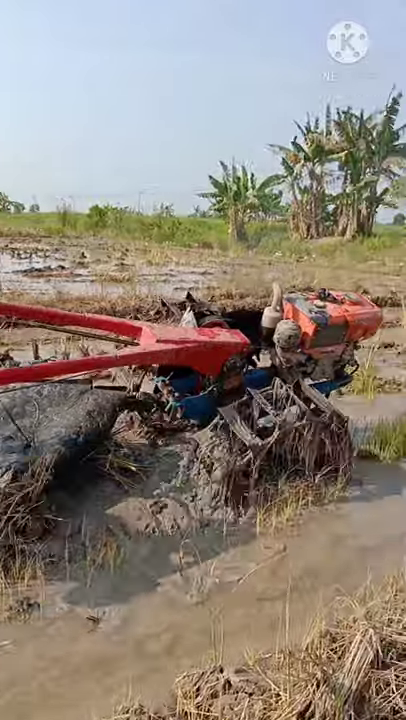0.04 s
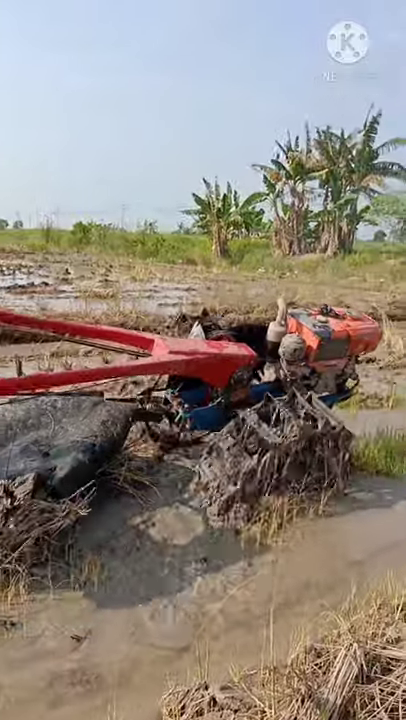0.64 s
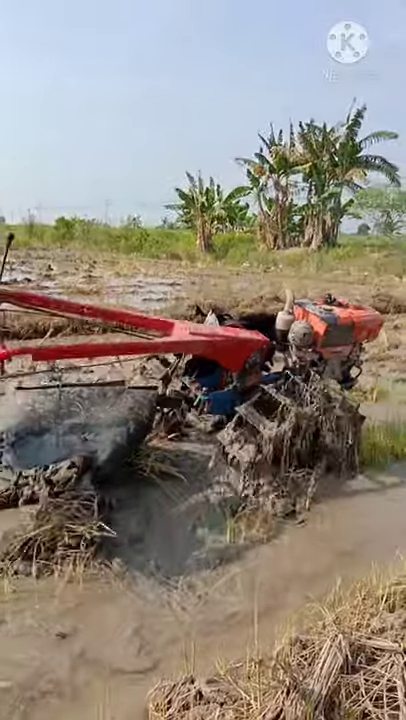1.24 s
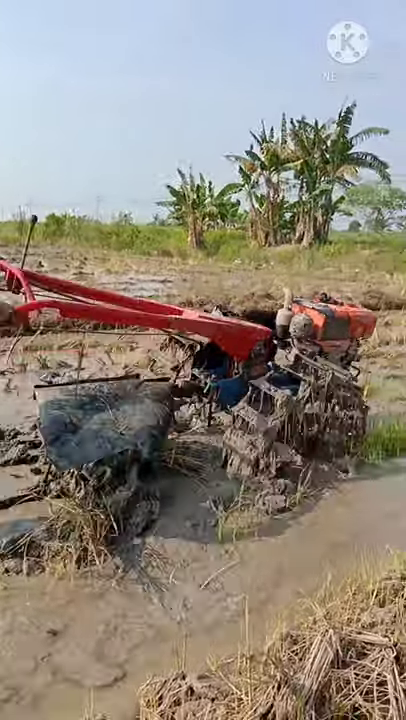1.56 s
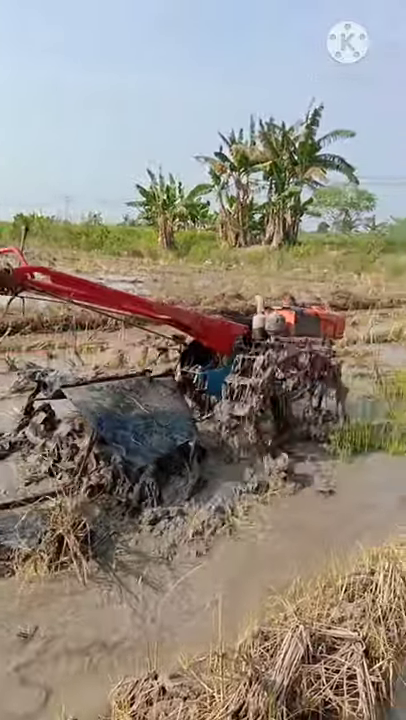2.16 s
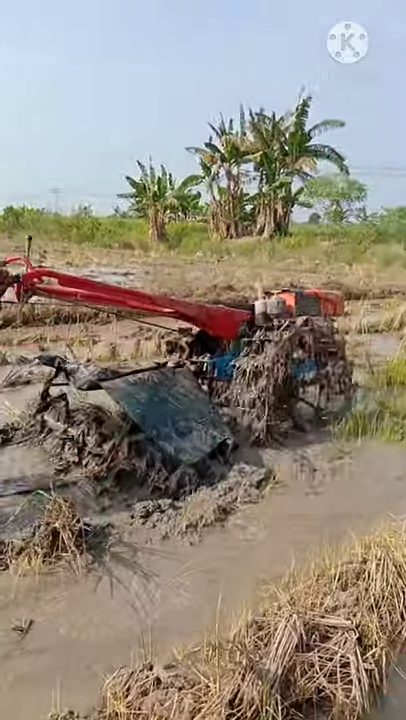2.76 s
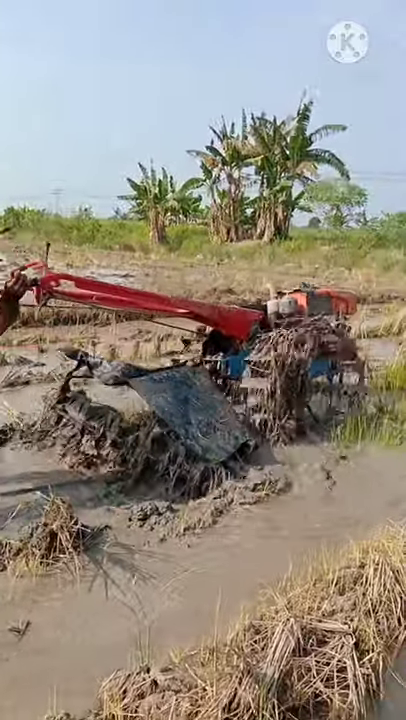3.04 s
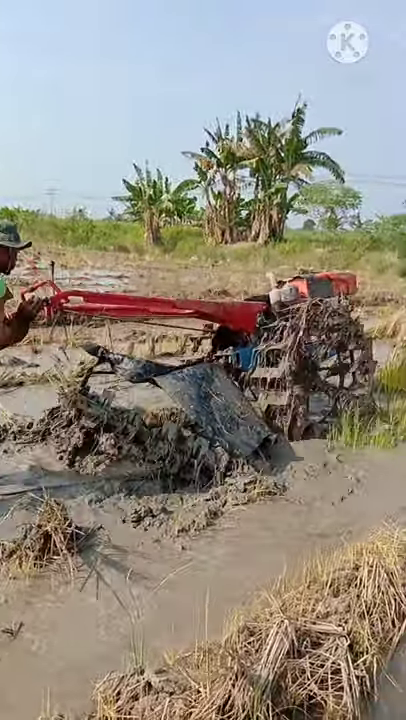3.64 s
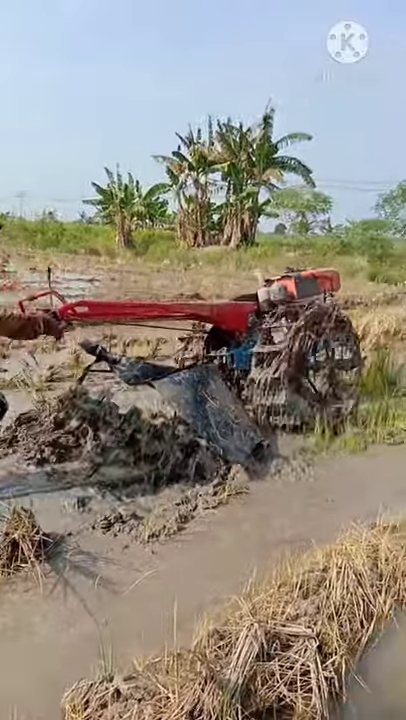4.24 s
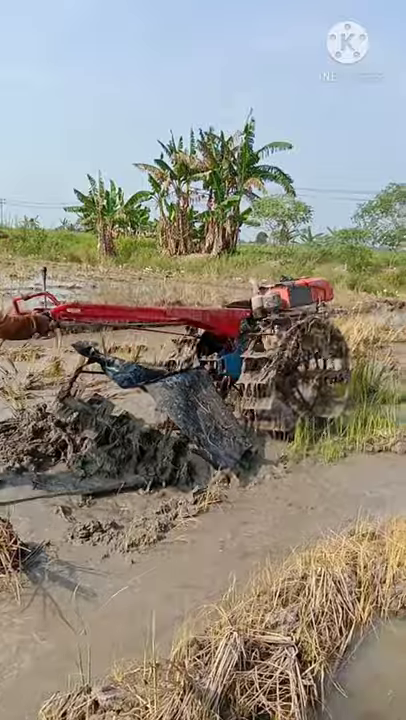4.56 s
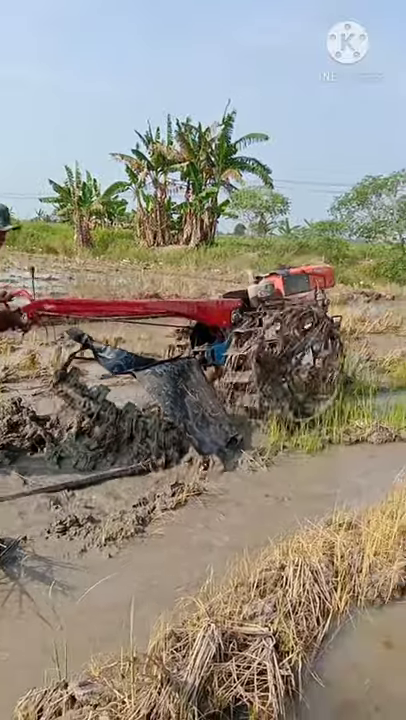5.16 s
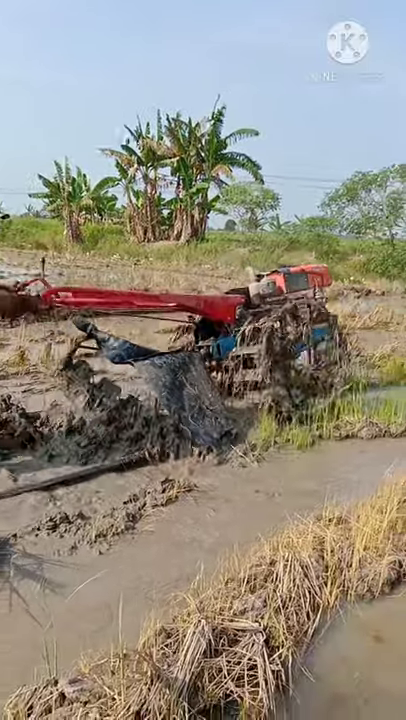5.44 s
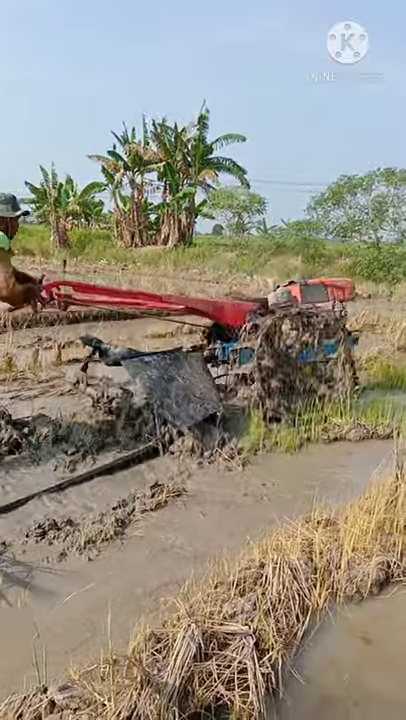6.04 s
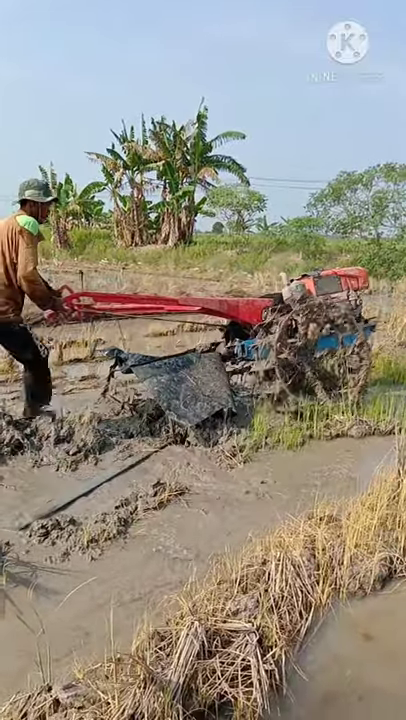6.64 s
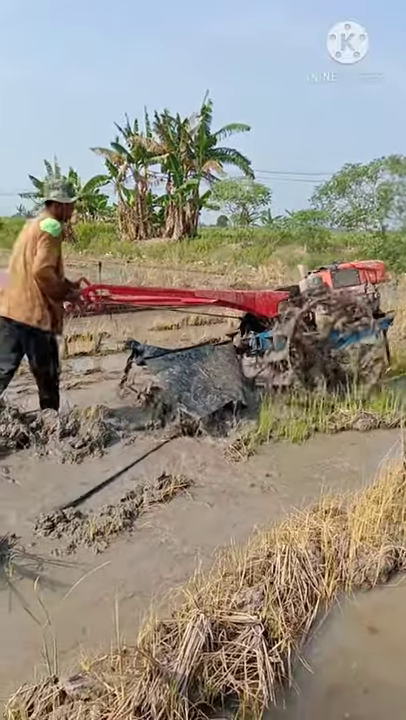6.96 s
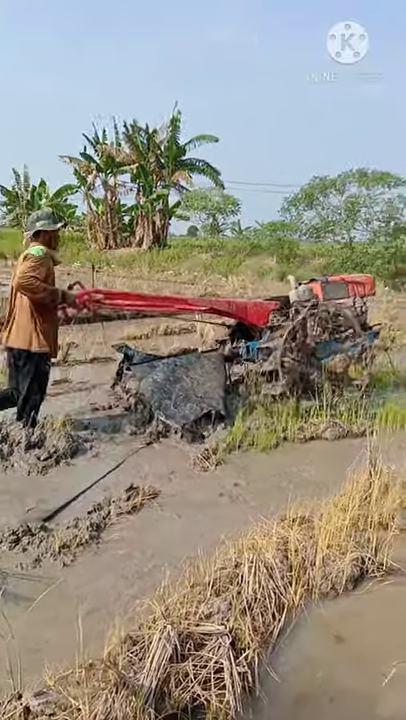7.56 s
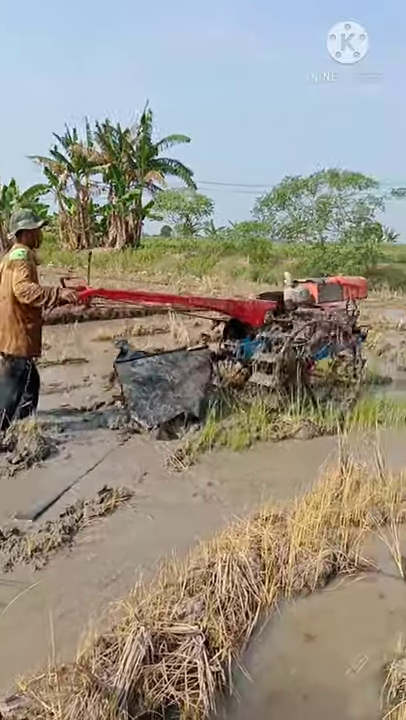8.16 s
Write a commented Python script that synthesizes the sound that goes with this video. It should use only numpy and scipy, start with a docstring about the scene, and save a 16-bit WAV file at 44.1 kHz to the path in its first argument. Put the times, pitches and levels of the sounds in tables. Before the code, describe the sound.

In an open, muddy field with no echo, a nearby walking tractor runs with a steady, hammering diesel beat. Each firing shakes loose steel into a clank, some ringing briefly, over a continuous metallic rattle. Gusts rumble on the microphone and build around the middle, where a few chassis knocks and mud splats are heard. The engine slows a little under load as the wind drops.

```python
"""Walking tractor in a flooded rice field

A one-cylinder diesel drags a plough through mud, a few metres away in the open. It fires about six
times a second: burning fuel knocks, then loose steel clanks and exhaust gas gives a low thump.
Gears and sheet metal clatter, the chassis knocks, mud splats, and gusts buffet the microphone."""
import sys
import numpy as np
from scipy import signal
from scipy.fft import rfft, irfft, next_fast_len
from scipy.io import wavfile
from scipy.ndimage import uniform_filter1d

SR = 44100
rng = np.random.default_rng(int(sys.argv[2]) if len(sys.argv) > 2 else 0)


def generate_wav(sig):
    """Save sig (samples, or channels by samples) to the path in sys.argv[1] as 16-bit PCM at SR."""
    pcm = np.round(np.clip(np.atleast_2d(sig).T, -1, 1) * 32767).astype(np.int16)
    wavfile.write(sys.argv[1], SR, pcm)


N = 370881
TIME = np.arange(N) / SR
BURST = np.arange(8192) / SR  # time within one short sound
MIDDLE_S = BURST[-1] / 2

# tone colour of small rattling metal parts: (frequency [Hz], gain [dB])
RATTLE_COLOUR = [(2500, -17), (4200, -2), (5000, -1.5), (5700, 5.5), (7500, 6), (8400, -8), (9400, -110),
                 (10400, -14), (11500, -11.5), (13000, 0.5), (15500, -1.5)]


def undb(db):
    """Turn decibels into a gain to multiply by."""
    return 10 ** (np.asarray(db) / 20)


def unit(x):
    """Scale a sound to an average (rms) level of 1."""
    return x / np.sqrt(np.mean(x ** 2))


def at(table, s):
    """Read each column of a timed table at time s."""
    times, *columns = np.transpose(table)
    return [np.interp(s, times, column) for column in columns]


def add(out, s, sound):
    """Mix a sound in, starting at time s."""
    start = int(round(s * SR))
    lo, hi = max(start, 0), min(start + len(sound), N)
    if hi > lo:
        out[lo:hi] += sound[lo - start:hi - start]


def shaped(x, points):
    """Colour a sound with an outline of (frequency [Hz], gain [dB]) points."""
    hz, db = np.transpose(points)
    size = next_fast_len(len(x), real=True)
    freqs = np.fft.rfftfreq(size, 1 / SR) + 1
    gain = undb(np.interp(np.log(freqs), np.log(hz), db))
    return irfft(rfft(x, size) * gain, size)[:len(x)]


def resonate(x, modes, scatter_db=0, low_hz=640):
    """Ring a part's natural notes (modes); small metal parts give off little below low_hz."""
    out = 0
    for (hz, width, db), luck in zip(modes, rng.standard_normal(len(modes))):
        b, a = signal.iirpeak(min(hz, SR / 2 - 1), hz / width, SR)
        # each note is struck from its own spot, a moment apart from the others
        late = np.r_[np.zeros(rng.integers(SR // 1000)), x][:len(x)]
        out = out + undb(db + scatter_db * luck) * signal.lfilter(b, a, late)
    return signal.sosfilt(signal.butter(8, low_hz, "high", fs=SR, output="sos"), out)


def wander(rate):
    """A smooth random curve of size about 1 that takes `rate` new values a second."""
    hold = max(int(SR / rate), 2)
    steps = np.repeat(rng.standard_normal(N // hold + 1), hold)
    return unit(uniform_filter1d(uniform_filter1d(steps, hold), hold)[:N])


def grit(size, spread_db):
    """Dense tiny impacts of very unequal strength."""
    return unit(rng.standard_normal(size) * undb(spread_db * np.clip(rng.standard_normal(size), -3, 3)))


def burst(rise_s, decay_s, tail_db, tail_s, spread_db):
    """A gritty burst with a quick rise, a fall and a fainter, longer tail."""
    rise = 1 - np.exp(-(BURST / rise_s) ** 2)
    fall = np.exp(-BURST / decay_s) + undb(tail_db) * np.exp(-BURST / tail_s)
    return grit(len(BURST), spread_db) * rise * fall


def hit(x, db):
    """Scale an impact so that its first 12 ms have the given level."""
    return x * undb(db) / np.std(x[:int(.012 * SR)])


def swell(hz, rise_s, fall_s, phase, glide=0):
    """A tone that swells until MIDDLE_S and dies away; glide bends its pitch."""
    t = BURST - MIDDLE_S
    envelope = np.exp(-(t / np.where(t < 0, rise_s, fall_s)) ** 2)
    return np.sqrt(2) * envelope * np.cos(2 * np.pi * (hz * (t + glide * t ** 2 / 2) + phase))


def firings():
    """The ignition time and the length of every engine cycle, in seconds."""
    # engine speed, sagging and recovering as the plough bites: (time [s], firings [per s])
    speed = [(0.0, 6.695), (0.48, 7.232), (1.2, 6.491), (1.68, 7.017), (2.38, 6.064), (3.24, 6.144),
             (3.82, 5.804), (4.36, 6.212), (4.6, 5.8), (4.94, 6.602), (5.42, 6.391), (5.56, 6.082),
             (5.88, 6.514), (6.6, 5.942), (7.2, 5.98), (7.86, 5.443), (8.4, 5.936)]
    rate, = at(speed, TIME)
    cycles = np.cumsum(rate) / SR
    times = np.interp(np.arange(.657, cycles[-1], 1), cycles, TIME)  # the first comes .657 cycles in
    return list(zip(times, 1 / np.interp(times, TIME, rate)))


def wind():
    """Swirls of air tumble over the microphone; hard gusts break into smaller, brighter ones."""
    # strength of the wind: (time [s], relative level [dB])
    gusts = [(0.0, -25.5), (0.35, -29), (0.65, -25), (0.89, -29), (1.9, -29), (2.08, -27), (2.46, -34),
             (2.79, -30), (3.07, -24), (3.19, -20), (3.56, -24), (4.14, -20.5), (4.5, -22), (4.87, -20),
             (5.2, -25.5), (6.39, -24), (6.53, -28), (6.84, -31), (6.98, -26), (7.26, -26.5), (7.61, -32.5),
             (7.75, -33), (8.01, -35), (8.41, -33)]
    # sudden puffs on top: (time [s], half length [s], boost [dB])
    puffs = [(0.607, .07, 2.5), (2.934, 0.054, 6), (3.293, 0.045, 5.5), (3.963, 0.11, 2), (4.38, .05, 2.5),
             (5.416, .04, 1), (7.203, .05, 2)]
    # tone colour of the large swirls: (frequency [Hz], gain [dB])
    large_colour = [(20, -28), (40, -23), (65, -2), (110, 2.5), (170, 1.5), (280, -7), (400, -15.5),
                    (520, -35), (900, -50), (2000, -78)]
    # single swirls that pop: (time [s], pitch [Hz], level [dB])
    pops = [(0.632, 222, -13.5), (3.281, 189, -9.5), (4.615, 200, -11), (4.912, 139, -12),
            (5.957, 258, -17.5), (6.159, 206, -14), (6.485, 295, -14.5), (7.048, 350, -21)]
    small_colour = [(100, -16), (280, 2.5), (450, -5), (700, -12), (1500, -31), (4000, -67)]
    gust_db, = at(gusts, TIME)
    gust_db += .15 * np.minimum(gust_db + 25, 0)  # in a lull the rumble fades faster than the wind
    puff_db = sum(db * np.exp(-((TIME - s) / half) ** 2) for s, half, db in puffs)
    gust_db += puff_db - .93 + 2.22 * wander(40)
    large = unit(shaped(rng.standard_normal(N), large_colour)) * undb(gust_db + 1.5)
    share_db = np.minimum(gust_db + 9, -6)  # small swirls grow faster, but stay under the large ones
    small = unit(shaped(rng.standard_normal(N), small_colour)) * undb(gust_db + share_db)
    out = large + small
    for s, hz, db in pops:
        pop = swell(hz, rise_s=.87 / hz, fall_s=.58 / hz, phase=rng.random())
        add(out, s - MIDDLE_S, undb(db) * pop)
    return out


def knocks_and_splats():
    """Chassis knocks and mud splats, from dull thuds to bright hissing splashes."""
    # knocks and splats: (time [s], level [dB], decay [s], centre frequency [Hz])
    impacts = [(2.486, -20.5, 0.02, 710), (4.203, -18, 0.015, 1640), (4.690, -32, .012, 6500),
               (4.717, -27.5, 0.044, 5000), (4.771, -18.5, 0.0074, 7250), (4.778, -20, 0.021, 1040),
               (4.816, -27, 0.0043, 7000), (5.836, -29, 0.032, 5500), (5.924, -17.5, 0.0079, 9100),
               (5.938, -21, 0.0088, 1530), (7.033, -23.5, 0.03, 900)]
    # tone colour of the struck wheels and guard: (frequency [Hz], gain [dB])
    guard_colour = [(200, -4), (400, 15.5), (580, -5), (900, 14), (1300, -1), (1850, 0), (2300, 9.5),
                    (3200, 1.5), (3800, -0.5), (4800, -8), (7400, 0), (9200, -16), (14000, -8.5)]
    out = np.zeros(N)
    for s, db, decay, hz in impacts:
        strike = burst(rise_s=.0031, decay_s=decay, tail_db=-19, tail_s=.028, spread_db=3)
        impact = shaped(shaped(strike, guard_colour), [(hz / 8, -20), (hz, 0), (hz * 8, -17)])
        add(out, s, hit(impact, db))
    return out


def clatter():
    """Gears, belt and loose panels make dense small impacts that flutter in strength."""
    # strength of the clatter: (time [s], relative panel level [dB], relative rattle level [dB])
    levels = [(0.0, -28.5, -34.5), (0.84, -26.5, -35), (1.57, -28, -32.5), (3.04, -31, -38.5),
              (3.3, -35.5, -45.5), (3.46, -35, -43), (3.72, -29.5, -37.5), (3.96, -35, -44.5),
              (5.92, -31, -38), (6.32, -32, -41), (7.03, -32, -39), (8.41, -32.5, -39)]
    # notes of the gear case and panels: (pitch [Hz], width [Hz], gain [dB])
    panel_modes = [(825, 120, 2), (892, 137, -1), (1033, 59, -1.5), (1546, 140, 2), (2145, 105, -1),
                   (2544, 220, 0), (2960, 375, -2), (3760, 320, -7.5)]
    panel_db, rattle_db = at(levels, TIME)
    flutter = wander(130)
    panels = 0
    for mode in panel_modes:
        impacts = grit(N, spread_db=5.5) * undb(2.26 * flutter + 2 * wander(45))
        panels += resonate(impacts, [mode])
    fine_impacts = grit(N, spread_db=3) * undb(1.36 * flutter + 2.3 * wander(400))
    rattle = shaped(fine_impacts, RATTLE_COLOUR)
    return unit(panels) * undb(panel_db + .05) + unit(rattle) * undb(rattle_db - .7)


def clanks():
    """Each firing kicks loose steel against its stop; it lands differently, so the main note varies."""
    # clank strength as the frame rocks: (time [s], relative body level [dB], relative treble level [dB])
    levels = [(0.12, -22, -17.5), (0.55, -22, -19.5), (0.85, -22.5, -27), (1.3, -19.5, -16.5),
              (1.75, -20.5, -28), (2.1, -25, -33), (2.5, -21.5, -22), (3.15, -23.5, -24.5),
              (3.42, -29, -29), (3.8, -22.5, -29.5), (4.28, -25.5, -24.5), (4.48, -36, -40),
              (4.65, -26, -22), (5.12, -23.5, -21), (5.3, -32, -48), (5.6, -23, -24.5), (5.95, -26, -31),
              (6.23, -23, -24.5), (6.55, -21.5, -26), (7.4, -24, -24.5), (8.28, -18.5, -19)]
    # notes of the frame, sheet-metal cover and steel parts: (pitch [Hz], width [Hz], gain [dB])
    frame_modes = [(794, 170, -10.5), (962, 160, -2), (1452, 180, -5.5), (2407, 175, -3.5), (2620, 400, -6),
                   (2990, 610, -10.5)]
    cover_modes = [(3750, 130, 6.5), (4110, 200, -1), (5640, 330, -2), (6640, 380, -3), (7860, 530, -5),
                   (11100, 320, -29), (13050, 830, -9), (14400, 850, -18)]
    steel_modes = [(2325, 65, -3.5), (2580, 37, -13), (3798, 31, -2), (4030, 17, 5), (5845, 73, -2.5),
                   (6330, 40, 1), (7860, 33, -4), (10640, 66, -11), (14000, 73, -27)]
    # jolts that make one note ring out: (time [s], pitch [Hz], relative level [dB])
    clangs = [(0.41, 3220, -25.5), (0.69, 3930, -22), (0.98, 2570, -21), (1.13, 5700, -21),
              (1.87, 2460, -27), (2.17, 2410, -21), (2.33, 2440, -23), (5.12, 2770, -22), (5.6, 3790, -24),
              (5.76, 3720, -26), (5.91, 3800, -23.5), (6.55, 3830, -25), (6.89, 3860, -24),
              (7.75, 3990, -23.5)]
    lower_notes = [hz for hz, _, _ in steel_modes if hz < 7000]
    out = np.zeros(N)
    for ignition, period in firings():
        s = ignition + .174 * period
        body_db, treble_db = at(levels, s) + 1.4 * rng.standard_normal(2)
        # the main note is a nearby clang if there is one, or else a faint note of the steel
        faint_note = rng.choice(lower_notes), body_db - 9
        nearby_clangs = ((hz, db) for when, hz, db in clangs if abs(when - s) < period / 2)
        note_hz, note_db = next(nearby_clangs, faint_note)
        jolt = burst(rise_s=.0011, decay_s=.0054, tail_db=-18.5, tail_s=.041, spread_db=6)
        body = resonate(jolt, frame_modes, scatter_db=-2)
        chatter = burst(rise_s=.0031, decay_s=.004, tail_db=-11.5, tail_s=.021, spread_db=4)
        cover = resonate(chatter, cover_modes, scatter_db=2, low_hz=2500)
        ring = resonate(chatter, steel_modes, scatter_db=4.5, low_hz=1820)
        ring *= np.exp(-BURST / .061)  # the steel is clamped, so its ring dies quickly
        snap = burst(rise_s=.0044, decay_s=.007, tail_db=-22, tail_s=.02, spread_db=12)
        crack = shaped(snap, [(7000, -34), (11500, -12), (13000, 10)])
        treble = hit(cover, treble_db - 3.5) + hit(ring, treble_db - 9) + hit(crack, treble_db - 11)
        add(out, s - .001, hit(body, body_db - .5) + treble)
        note = swell(note_hz, rise_s=.0056, fall_s=.0025, phase=rng.random())
        add(out, s + .0055 - MIDDLE_S, undb(note_db + 4.5) * note)
    return out


def knock(chamber_hz, chamber_db, block_db):
    """Fuel ignites: its chamber rings, and the jump in pressure strikes the block, which shudders."""
    # engine block tones that swell as fuel burns: (pitch [Hz], rise [s], fall [s], relative level [dB])
    block_tones = [(843, 0.0036, 0.01, -9.5), (1020, 0.0049, 0.0043, -5.5), (1640, 0.0034, 0.0025, -7.5)]
    # notes of the struck engine block: (pitch [Hz], width [Hz], gain [dB])
    block_modes = [(843, 144, -1.5), (988, 30, 1), (1133, 63, -1), (1540, 210, 1.5), (1650, 92, -13),
                   (2280, 250, -5.5), (2620, 590, -12), (3620, 1100, -21), (6400, 730, -34.5),
                   (14000, 1800, -63)]
    tone = undb(chamber_db + 2.5) * swell(chamber_hz, rise_s=.0038, fall_s=.005, phase=rng.random())
    for hz, rise, fall, db in block_tones:
        pitch = hz * (1 + .013 * rng.standard_normal())
        tone += undb(block_db + db + 3.5) * swell(pitch, rise, fall, phase=rng.random())
    jump = burst(rise_s=.004, decay_s=.006, tail_db=-16, tail_s=.03, spread_db=3)
    tremble = burst(rise_s=.015, decay_s=.033, tail_db=-7, tail_s=.059, spread_db=4.5)
    crack = hit(resonate(jump, block_modes, scatter_db=-1.5), block_db + .5)
    rattle = hit(shaped(jump, RATTLE_COLOUR), block_db - 12)
    shudder = unit(resonate(tremble, block_modes, scatter_db=1.5)) * undb(block_db - 13)
    return tone, crack + rattle + shudder


def exhaust(out, s, period, thump_db):
    """Add one cycle's low thumps: gas swings back and forth in the pipes, gliding in pitch."""
    # swings of gas: (delay [cycles], pitch [Hz], glide [share of pitch per s], rise [s], fall [s],
    # relative level [dB], randomness [0-1])
    gas_swings = [(.168, 107.4, 10.5, 0.0084, 0.014, 2.5, 0.16), (.36, 266, -3.5, 0.0055, 0.0087, -5, 0.3),
                  (.4, 141, -2, 0.011, 0.013, -7.5, 0.4), (.67, 159, -1, 0.013, 0.017, -12, 0.4)]
    build_up_s = .0207  # the pipes need this long to get swinging
    for cycles, hz, glide, rise, fall, db, randomness in gas_swings:
        luck = randomness * rng.standard_normal(3)
        gas = swell(hz * (1 + .088 * luck[0]), rise, fall, phase=.5 * luck[1], glide=glide)
        peak_s = s + build_up_s + cycles * period
        add(out, peak_s - MIDDLE_S, gas * undb(thump_db + db + 3.8 * luck[2]))


def valves(out, s, period):
    """Add one cycle's light metal ticks from the parts that work the valves."""
    # valve ticks: (delay after ignition [cycles], level [dB])
    ticks = [(.55, -51), (.69, -43.5), (0.801, -49)]
    for cycles, db in ticks:
        luck = rng.standard_normal(2)
        tap = burst(rise_s=.00037, decay_s=.0019, tail_db=-27, tail_s=.0057, spread_db=11)
        tick = hit(shaped(tap, RATTLE_COLOUR), db + 1.9 * luck[1])
        add(out, s + (cycles + .029 * luck[0]) * period, tick)


def engine():
    """Every cycle of the diesel brings a knock, exhaust thumps and valve ticks."""
    # knock strength: (time [s], relative chamber level [dB], relative block level [dB])
    levels = [(0.2, -28, -24), (0.52, -16.5, -22.5), (0.95, -22, -20.5), (1.45, -22.5, -22.5),
              (2.2, -27, -24.5), (2.7, -20.5, -23.5), (3.12, -20.5, -24.5), (3.3, -22.5, -35),
              (3.8, -19.5, -27), (4.1, -30, -36), (4.3, -20, -33.5), (4.95, -35.5, -27.5), (5.25, -23, -27),
              (5.6, -27, -28), (6.3, -26.5, -25), (6.8, -24.5, -26.5), (7.9, -23, -27.5), (8.1, -33, -26.5)]
    out = np.zeros(N)
    for s, period in firings():
        burn = rng.standard_normal(4)  # no two firings burn alike
        chamber_hz = 1543 + 30 * burn[0]
        chamber_db, block_db = at(levels, s)
        tone, shake = knock(chamber_hz, chamber_db + 2.1 * burn[1], block_db + burn[2])
        add(out, s - .0015 - MIDDLE_S, tone)
        add(out, s - .007, shake)
        exhaust(out, s, period, thump_db=-20 + 1.36 * burn[3])
        valves(out, s, period)
    return out


def scene():
    """All sources in one channel, in an open field with no walls to echo."""
    return (engine() + clanks() + clatter() + knocks_and_splats() + wind())[None]


def record(dry):
    """The microphone rounds off the tallest peaks and cuts the highest treble."""
    ceiling, top_hz = .8, 15600
    rounded = ceiling * np.tanh(dry / ceiling)
    return signal.sosfilt(signal.ellip(10, .2, 80, top_hz, fs=SR, output="sos"), rounded)


dry = scene()
out = record(dry)
generate_wav(out)
```